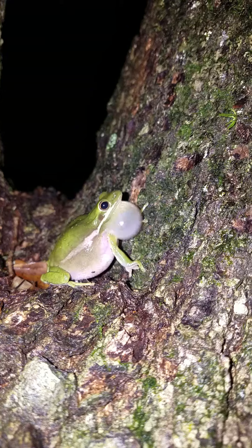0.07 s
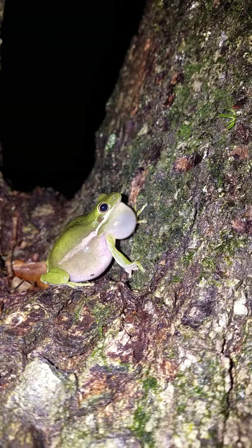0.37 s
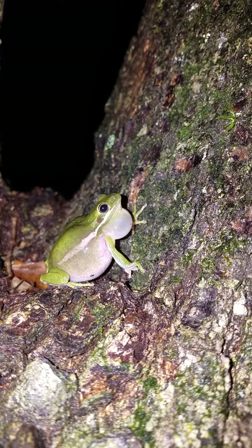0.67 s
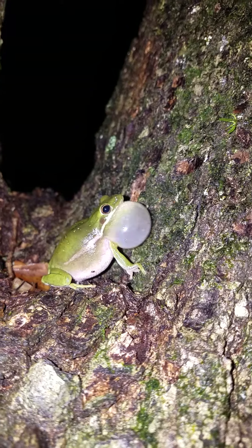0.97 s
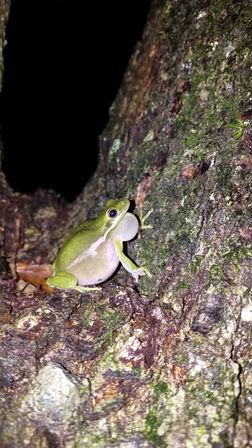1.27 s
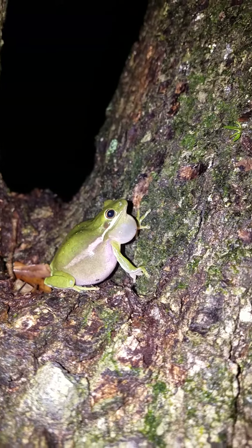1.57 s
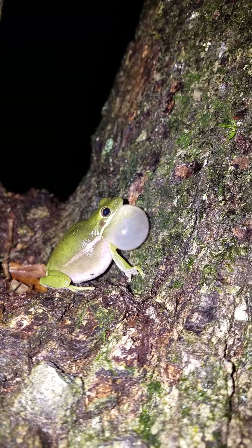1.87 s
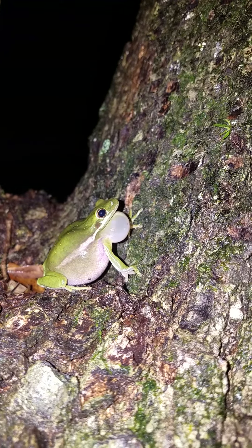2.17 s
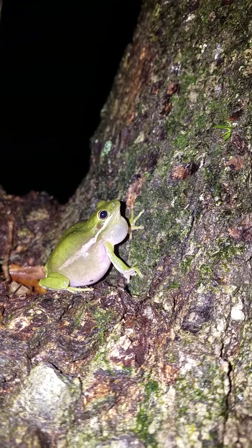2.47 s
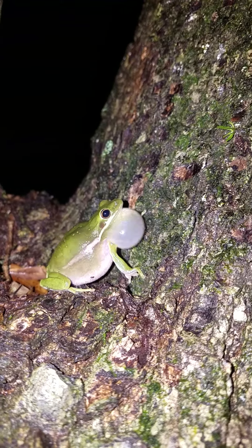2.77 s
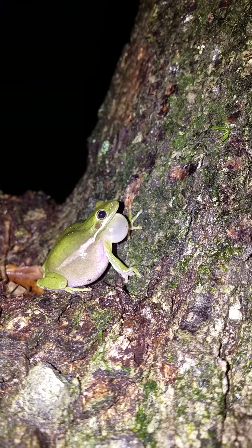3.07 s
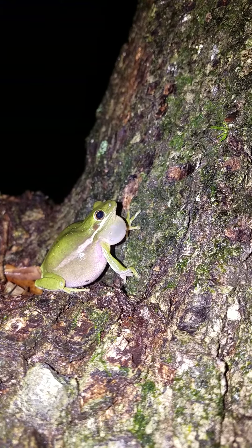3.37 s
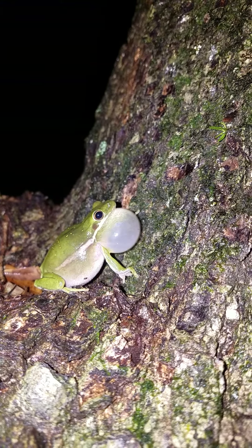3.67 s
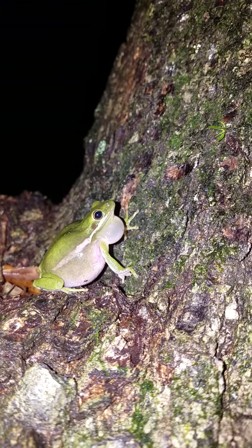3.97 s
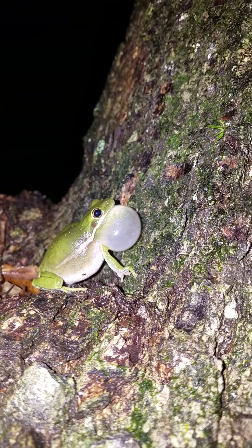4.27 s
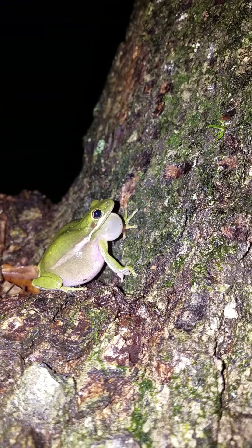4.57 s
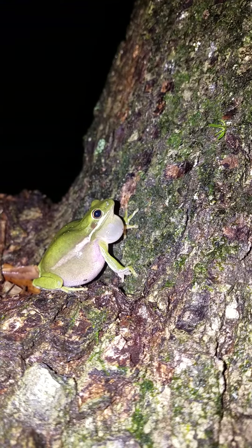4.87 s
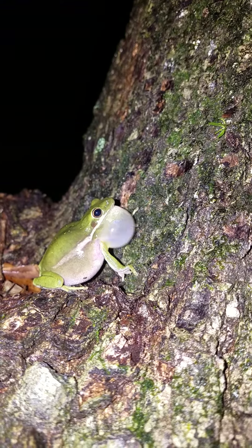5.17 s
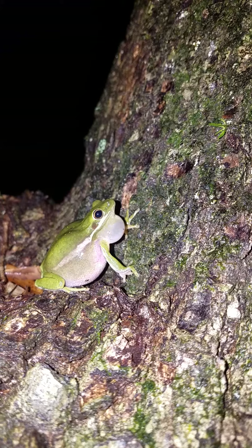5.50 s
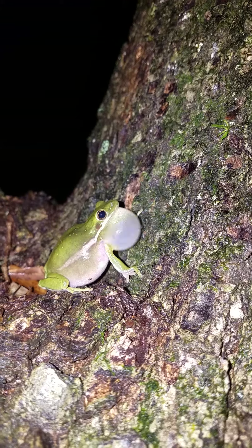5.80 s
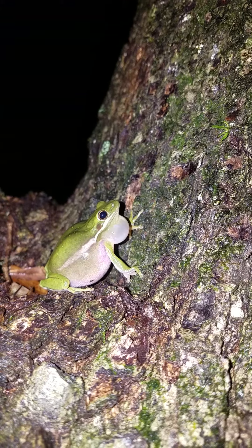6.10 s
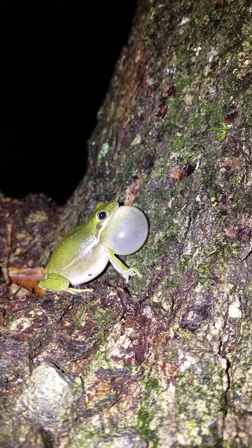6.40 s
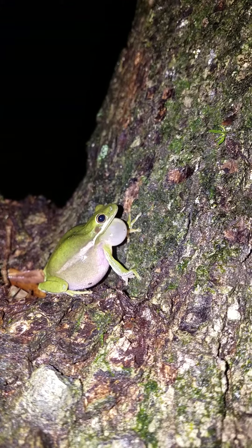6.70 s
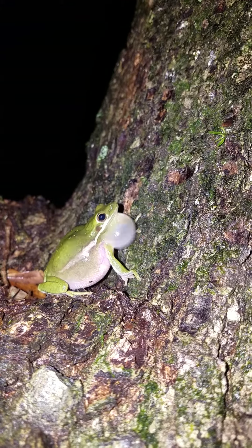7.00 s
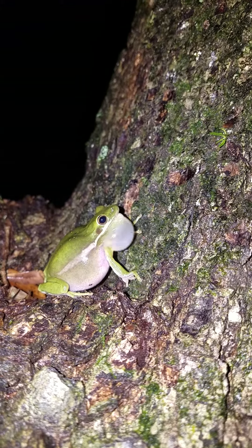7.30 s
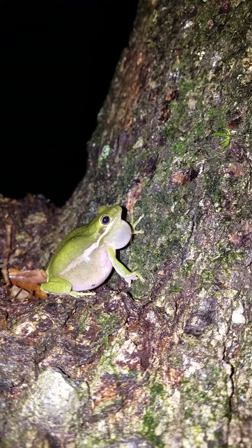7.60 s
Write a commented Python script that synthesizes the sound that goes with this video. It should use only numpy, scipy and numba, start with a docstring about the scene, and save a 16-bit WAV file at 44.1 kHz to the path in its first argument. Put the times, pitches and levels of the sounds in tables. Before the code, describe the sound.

A tree frog honks loudly and close, ten times, over a night chorus of other frogs and trilling crickets.

```python
"""Ten loud honks from a green tree frog on a trunk at night, a hand's width from a phone.
Each honk is a train of vocal-fold pulses locked to the ring of the throat sac, ending in a falling tone.
Other frogs answer across a pond; crickets trill, a katydid rasps in fours, the air rumbles faintly,
and one soft knock comes near the end. In the longer pauses the phone's gain control lifts the whole
night, until the next honk pushes it down."""
import sys
import numpy as np
from scipy import signal
from scipy.fft import rfft, irfft
from scipy.io import wavfile
from scipy.ndimage import uniform_filter1d, minimum_filter1d
from numba import njit

SR = 44100
rng = np.random.default_rng(int(sys.argv[2]) if len(sys.argv) > 2 else 0)


def master(y):
    """Save y as 16-bit WAV."""
    cut = np.clip(np.atleast_2d(y).T, -1, 1)
    pcm = np.round(cut * 32767)  # scale
    wavfile.write(sys.argv[1], SR, pcm.astype(np.int16))


N = 346185
TIME = np.arange(N) / SR
LEAD_S = .012  # run-in before a honk's first strong pulse

# Course of one honk. Each row: time in seconds, sac ring in Hz, ring gain in dB, buzz gain in dB,
# formant in Hz, formant boost in dB.
COURSE = [(0, 886, -2, 5, 2300, -19), (.008, 877, -4.5, 4, 2440, 12.5), (.03, 890.5, -3.5, 7, 2600, 14.5),
          (.06, 875.5, -4.5, 10.5, 2870, 5), (.085, 868.4, -4, 10.5, 3075, 3),
          (.145, 851.3, -6, 8, 3180, 0.5)]


def undb(db):
    return 10 ** (np.asarray(db) / 20)


def level(x, rms_db):
    return x * undb(rms_db) / np.sqrt(np.mean(x ** 2))


def curve(rows, x):
    """Table columns, interpolated at x along the first."""
    knots, *columns = np.transpose(rows)
    return [np.interp(x, knots, column) for column in columns]


def pan(db):
    """Channel gains for left minus right in dB."""
    return undb(np.array([[db], [-db]]) / 2)


def add(track, x, start_s):
    """Mix x into the track in place."""
    at = int(start_s * SR) + np.arange(len(x))
    inside = (at >= 0) & (at < len(track))
    track[at[inside]] += x[inside]


def colour(x, points, size=2048):
    """Minimum-phase filter through (Hz, dB) points."""
    hz, db = np.transpose(points)
    gain_db = np.interp(np.log(np.arange(size // 2 + 1) * SR / size + 1), np.log(hz), db)
    cepstrum = irfft(np.log(undb(gain_db)))[:size // 2]
    cepstrum[1:] *= 2
    impulse = irfft(np.exp(rfft(cepstrum, size)))[:size // 2]
    return signal.oaconvolve(x, impulse)[:len(x)]


def noise(points, rms_db):
    return level(colour(rng.standard_normal(N), points), rms_db)


def walk(rate_hz):
    """Random drift, spread near 1."""
    knots = np.arange(0, N / SR + 1, 1 / rate_hz)
    return np.interp(TIME, knots, rng.standard_normal(len(knots)))


@njit
def resonance(x, hz, width_hz):
    """State-variable band-pass: moving centre, unity peak gain."""
    y, band, low = np.empty(len(x)), 0., 0.
    for i in range(len(x)):
        g, damping = np.tan(np.pi * min(hz[i], .45 * SR) / SR), width_hz / hz[i]
        v = (band + g * (x[i] + 1e-18 - low)) / (1 + g * (g + damping))
        band, low, y[i] = 2 * v - band, low + 2 * g * v, damping * v
    return y


def clicks(times_s, sizes, count):
    """Band-limited clicks at sub-sample times."""
    at = (times_s * SR).astype(int)[:, None] + np.arange(-7, 9)
    offset = at - times_s[:, None] * SR
    shape = np.sinc(offset) * np.cos(np.pi * offset / 16) ** 2
    return np.bincount(np.clip(at, 0, count - 1).ravel(), (sizes[:, None] * shape).ravel(), count)


def trees(x, t60_s):
    """Echoes scattered by trunks and leaves, different at each microphone port."""
    t = TIME[:SR]
    tails = rng.standard_normal((2, SR)) * undb(-60 * t / t60_s) * (1 - np.exp(-t / .01))
    return signal.fftconvolve(x[None], tails / np.sqrt(np.sum(tails ** 2) / 2), axes=1)[:, :N]


def night_air(draught_peak_s=.51, rise_db_per_s=33.5, fade_db_per_s=13):
    """Wash of far-off life, low hum of the land, and one draught brushing the microphone."""
    # Spectra of the three. Each row: frequency in Hz, gain in dB.
    wash_spectrum = [(200, -19), (620, -14.5), (900, 1), (1400, -1), (2100, 2.5), (2750, 6.5), (3200, 2.5),
                     (3800, -16), (4500, -7), (5500, -19.5), (8000, -32.5), (12500, -18), (16000, -22)]
    hum_spectrum = [(20, -25.5), (45, -14), (75, -4.5), (140, 1.5), (220, -6), (330, -13), (600, -13),
                    (1500, -42.5)]
    draught_spectrum = [(20, -23.5), (50, -18), (78, -3.5), (120, -13.5), (200, -33), (600, -57)]
    wash = np.array([noise(wash_spectrum, -52) * undb(walk(9.3)) for _ in range(2)])
    hum = noise(hum_spectrum, -68.5)
    since_s = TIME - draught_peak_s
    swell_db = np.minimum(rise_db_per_s * since_s, -fade_db_per_s * since_s)
    draught = noise(draught_spectrum, -55.5) * undb(swell_db + 1.5 * walk(5.6))
    return pan(-4.5) * wash + pan(-1.7) * (hum + draught)


def crickets(flutter_db=3, swell_db=1.7):
    """Many overlapping trills merge into one fluttering band."""
    # Trill spectrum. Each row: frequency in Hz, gain in dB.
    spectrum = [(5200, -41.5), (5950, -20.5), (6250, -3.5), (6550, -1), (6750, -19), (7300, -50.5)]
    ports = [noise(spectrum, -58.5) * undb(flutter_db * walk(70) + swell_db * walk(3.246))
             for _ in range(2)]
    return pan(-2.5) * np.array(ports)


def katydid(stroke_s=.088, tooth_hz=900, echo_db=-9):
    """Four wing strokes to a phrase; each drags a file of teeth over a scraper."""
    # Phrases. Each row: start in seconds, gain in dB.
    phrases = [(.195, 3), (1.789, 3.5), (3.594, 3), (5.652, 3), (7.349, 4)]
    # Rasp spectrum. Each row: frequency in Hz, gain in dB.
    spectrum = [(8500, -59), (10300, -22.5), (11800, -19), (13000, -14.5), (14800, -13.5), (15700, 1),
                (16500, -15)]
    stroke_phase = TIME[:int(4 * stroke_s * SR)] / stroke_s % 1
    strokes = np.clip(stroke_phase / .24, 0, 1) * np.clip((1 - stroke_phase) / .18, 0, 1)
    effort = np.zeros(N)
    for start_s, db in phrases:
        add(effort, undb(db) * strokes, start_s)
    tooth_phase = np.cumsum(tooth_hz * (1 + .09 * walk(83))) / SR % 1
    scrape = np.exp(-.7 * tooth_phase) * rng.standard_normal(N)
    rasp = effort * level(colour(scrape, spectrum), -55)
    return pan(8.8) * rasp + undb(echo_db) * trees(rasp, t60_s=.55)


def knock(start_s=7.388, gain_db=-27, centre_hz=339.7, width_hz=220., decay_s=.0068):
    """One soft, dull bump near the phone."""
    t = TIME[:SR // 10]
    burst = rng.standard_normal(len(t)) * np.exp(-t / decay_s)
    hz = np.full(len(t), centre_hz)
    out = np.zeros(N)
    add(out, resonance(resonance(burst, hz, width_hz), hz, width_hz), start_s)
    return undb(gain_db) * out


def resized(call, ring_hz):
    """The call of a larger or smaller frog: pitch and length scale together."""
    step = ring_hz / COURSE[0][1]
    return np.interp(np.arange(0, len(call), step), np.arange(len(call)), call)


def caller(call, ring_hz, first_s, period_s, slip_s, spread_db=2, pitch_spread=.00618):
    """One frog repeating its call on a loose beat."""
    out = np.zeros(N)
    for k, (late, sharp, loud) in enumerate(rng.standard_normal((20, 3))):
        varied = undb(spread_db * loud) * resized(call, ring_hz * (1 + pitch_spread * sharp))
        add(out, varied, first_s + k * period_s + slip_s * late)
    return out


def other_frogs(answer_hz=763, chorus_db=-39.5, direct_db=-4, echo_db=-6):
    """Neighbours a few metres off and a distant chorus, heard directly and off the trees."""
    # Neighbours. Each row: sac ring in Hz, first call in seconds, period in seconds, gain in dB.
    neighbours = [(896, .33, .665, -38.5), (768, .30, .725, -42.5), (925, .42, .70, -45)]
    # A big, deep frog answering in the pauses. Each row: start in seconds, gain in dB.
    answers = [(.50, -36.5), (1.16, -36), (1.60, -39.5), (2.35, -36.5), (2.51, -41.5), (3.10, -33.5),
               (3.77, -34), (4.47, -35.5), (5.14, -34.5), (5.83, -35.5), (6.63, -33.5), (7.50, -32.5)]
    # Distant frogs. Each row: sac ring in Hz, period in seconds.
    chorus = [(790, 0.68), (830, .61), (880, 0.42), (915, .56), (950, 0.44), (975, 0.85), (1015, .58),
              (1050, 1.1)]
    # Path through the wood. Each row: frequency in Hz, gain in dB.
    wood = [(550, -35), (680, -12.5), (750, 1), (1000, -1.5), (1200, -4.5), (1800, -0.5), (2250, -6),
            (2600, 4), (3100, 3), (3750, -5), (4120, 4.5), (5000, -13), (8000, -20)]
    calls = [honk(length_s, 0) for length_s in rng.uniform(.11, .15, 8)]
    near = sum(undb(db) * caller(call, hz, first_s, period_s, slip_s=.02)
               for call, (hz, first_s, period_s, db) in zip(calls, neighbours))
    for k, (start_s, db) in enumerate(answers):
        add(near, undb(db) * resized(calls[k % len(calls)], answer_hz), start_s - LEAD_S)
    far = sum(caller(call, hz, -rng.random() * period_s, period_s, slip_s=.05)
              for call, (hz, period_s) in zip(calls, chorus))
    near, far = colour(near, wood), colour(undb(chorus_db) * far, wood)
    direct = undb(direct_db) * (near + 1.01 * far)
    echo = undb(echo_db) * trees(near + 1.38 * far, t60_s=.7)
    return pan(-9.5) * direct + pan(-4) * echo


def fold_pulses(t, cycles, length_s, steady_gap=3, tick_db=-20):
    """Pulse times and strengths: the folds open on whole sac cycles, slowly, then fast, then slowly."""
    # Start-up and run-down. Each entry: gap between pulses in sac cycles.
    start_gaps = [7, 7, 7, 5, 4]
    end_gaps = [4, 4, 4, 4, 6]
    steady_cycles = np.interp(length_s, t, cycles) - sum(start_gaps[1:]) - sum(end_gaps)
    gaps = np.r_[start_gaps, [steady_gap] * round(steady_cycles / steady_gap), end_gaps]
    gaps[-9:-2] = rng.permutation(gaps[-9:-2])  # the run-down stumbles
    pulse_s = np.interp(np.r_[0, np.cumsum(gaps)] - gaps[0], cycles, t)
    push = np.ones(len(pulse_s))
    push[0] = undb(tick_db)  # a faint tick comes first
    return pulse_s, push


def sac_ring(pulse_s, push, sharpness, sigh, cycles, ring_s):
    """Throat sac: each pulse tops up the swing lost since the one before."""
    # Sac radiation. Each row: frequency in Hz, gain in dB.
    spectrum = [(150, -28.5), (290, -21), (470, -26), (600, -22.5), (710, -11), (870, -1), (1160, 8),
                (1450, 9.5), (1750, 11), (2100, 6), (2700, -36.5), (5000, -43.5)]
    refill = 1 - np.exp(-np.diff(pulse_s, prepend=-1) / ring_s)
    kicks = clicks(pulse_s + LEAD_S, push * refill, len(cycles))
    kicks = sharpness * uniform_filter1d(kicks, 15) + (1 - sharpness) * uniform_filter1d(kicks, 70)
    swing = signal.lfilter([1], [1, -np.exp(-1 / (ring_s * SR))], kicks)
    return colour((swing + sigh) * np.sin(2 * np.pi * cycles), spectrum)


def fold_buzz(snaps, formant_hz, boost_db, bright_db, formant_width_hz=295., edge_hz=4000.):
    """Fold snaps through a formant that climbs as the sac fills; harder calls gain most at edge_hz."""
    # Buzz spectrum. Each row: frequency in Hz, gain in dB.
    spectrum = [(500, -52.5), (1500, -18.5), (2050, -13.5), (2330, -5), (2650, 5), (2950, 4), (3220, 7),
                (3500, -4.5), (4200, 0), (4700, -6.5), (5400, -23), (6600, -36), (7200, -15), (7600, -14.5),
                (8300, -43.5), (9200, -39.5), (11000, -53), (16000, -53)]
    detune = 1 + .0083 * rng.standard_normal()
    formant = undb(boost_db) * resonance(snaps, formant_hz * detune, formant_width_hz)
    buzz = colour(snaps + formant, spectrum)
    edge = resonance(buzz, np.full(len(buzz), edge_hz), width_hz=1100.)
    return buzz + (undb(bright_db) - 1) * edge


def whistle(t, snaps, start_hz=16200, fall_hz_per_s=28000, width_hz=1500., gain_db=-29):
    """A thin, ragged whistle sliding down at the very top."""
    hz = start_hz - fall_hz_per_s * t
    ragged = snaps * rng.standard_normal(len(t))
    return undb(gain_db) * resonance(resonance(ragged, hz, width_hz), hz, width_hz)


def honk(length_s, bright_db, ring_s=.0049, sigh_s=.027, sigh_db=-9.5, fall_hz=165,
         snap_delay_s=.00036, jitter_s=.00003, shimmer_db=1, leak_db=-19):
    """One call: fold pulses ring the sac and buzz; the last air leaves as a sigh, a falling tone."""
    # Overtones of the sigh. Each row: multiple of the ring frequency, gain in dB.
    partials = [(2, -11), (3, -23.5), (4, -16.5), (5, -32)]
    t = TIME[:SR // 5] - LEAD_S
    ring_hz, ring_db, buzz_db, formant_hz, boost_db = curve(COURSE, t)
    slack = np.clip((t - length_s) / sigh_s, 0, 1)
    cycles = np.cumsum(ring_hz - fall_hz * slack ** .7) / SR
    cycles -= np.interp(0, t, cycles)
    pulse_s, push = fold_pulses(t, cycles, length_s)
    sharpness = np.sin(np.pi * np.clip(t / (length_s + sigh_s), 0, 1))  # folds open softly at both ends
    sigh = undb(sigh_db) * np.cos(np.pi / 2 * slack) * (1 - np.exp(-slack * sigh_s / ring_s))
    sac_push = push * undb(np.interp(pulse_s, t, ring_db))
    ring = sac_ring(pulse_s, sac_push, sharpness, sigh, cycles, ring_s)
    overtones = sum(undb(db) * np.sin(2 * np.pi * round(k) * cycles) for k, db in partials)
    overtones *= sigh * np.sqrt(1 - slack)
    # The snaps grow uneven as the pressure runs out.
    unevenness = np.interp(pulse_s / length_s, [.6, 1], [.06, 1])
    late, loud = unevenness * rng.standard_normal((2, len(pulse_s)))
    snap_s = pulse_s + LEAD_S + snap_delay_s + jitter_s * late
    snaps = clicks(snap_s, push * undb(shimmer_db * loud), len(t)) * undb(buzz_db + .16 * bright_db)
    snaps = sharpness * snaps + (1 - sharpness) * uniform_filter1d(snaps, 5)
    snaps += undb(leak_db) * sigh * (1 - slack) * rng.standard_normal(len(t))  # hiss through slack folds
    return ring + overtones - fold_buzz(snaps, formant_hz, boost_db, bright_db) + whistle(t, snaps)


def near_frog(echo_db=-43):
    """The frog on the trunk; the phone's body shades and delays it differently at the two ports."""
    # Calls. Each row: start in seconds, length to the last pulse in seconds, brightness in dB.
    honks = [(.070, .135, -1.5), (.895, .126, -2.5), (1.812, .126, -1.5), (2.743, .133, -1.5),
             (3.480, .129, -1), (4.203, .147, 1.5), (4.930, .137, 1.5), (5.579, .133, 1), (6.289, .146, 2),
             (7.008, .147, 2)]
    # Left port against right. Each row: frequency in Hz, gain in dB, phase lead in radians.
    ports = [(290, 1.0, 0.5), (870, -5, 0.05), (1220, -8.5, 1.06), (1450, -16, -0.33), (1890, -7, 3.5),
             (2516, 6, 7), (2678, -4, 7.5), (2740, 3, 8.5), (2960, -7.5, 7.5), (3780, 3.5, 8.5),
             (4160, -18, 8.5), (5170, -6.5, 12), (5960, 2, 11.5), (7500, -3, 15.5), (12960, 4.5, 28.5)]
    right = np.zeros(N)
    for start_s, length_s, bright_db in honks:
        add(right, honk(length_s, bright_db), start_s - LEAD_S - .001)
    port_db, lead_rad = curve(ports, np.arange(N // 2 + 1) * SR / N)
    left = irfft(rfft(right) * undb(port_db) * np.exp(1j * lead_rad), N)
    return np.array([left, right]) + undb(echo_db) * trees(right, t60_s=.98)


@njit
def ride_gain(headroom_db, attack_s=.06, hold_s=.56, rise_db_per_s=71.5, max_db=8.5, overshoot_db=.52):
    """Gain in dB: drops under a loud sound, holds, then climbs back while it stays quiet."""
    out, gain_db, quiet_s = np.empty(len(headroom_db)), 0., 0.
    for i, room_db in enumerate(headroom_db):
        quiet_s = 0. if room_db < 3 else quiet_s + 1 / SR
        if gain_db > room_db:
            gain_db = min(gain_db + (room_db - gain_db) / (attack_s * SR), room_db + overshoot_db)
        elif quiet_s > hold_s:
            gain_db = min(gain_db + rise_db_per_s / SR, max_db)
        out[i] = gain_db
    return out


def gain_control(x, aim_db=-10.5):
    """Automatic gain: follows the power of both channels, looking a few milliseconds ahead."""
    power = uniform_filter1d(np.mean(x ** 2, axis=0), SR // 150)
    gain_db = ride_gain(aim_db - 10 * np.log10(np.maximum(power, 1e-12)))
    ahead_db = minimum_filter1d(gain_db, SR // 100)
    return x * undb(uniform_filter1d(ahead_db, SR // 200))


def scene():
    """The near frog in front of the night chorus."""
    return near_frog() + katydid() + other_frogs() + crickets() + night_air() + knock()


def record(dry):
    """The phone rides its gain, clips at full scale and cuts the top."""
    top_hz = 15950
    lowpass = signal.ellip(10, .2, 70, top_hz, fs=SR, output="sos")
    return signal.sosfilt(lowpass, np.clip(gain_control(dry), -1, 1))


dry = scene()
out = record(dry)
master(out)
```